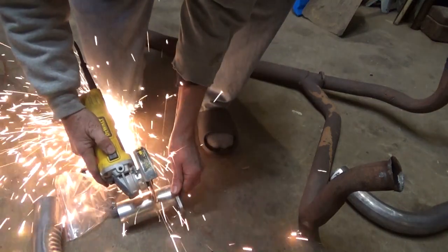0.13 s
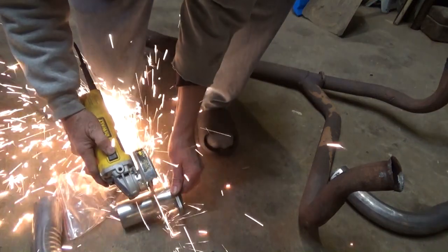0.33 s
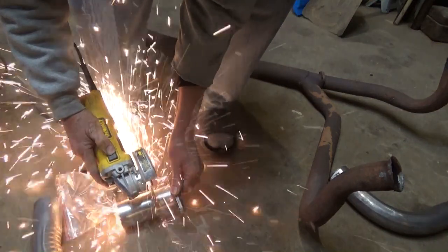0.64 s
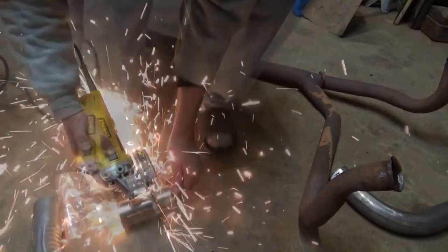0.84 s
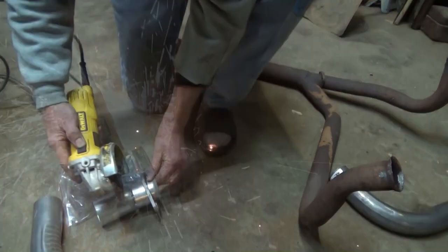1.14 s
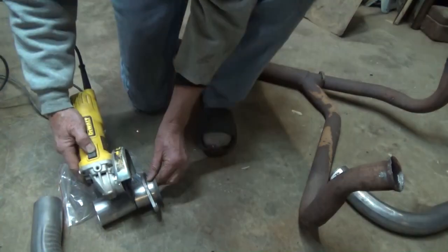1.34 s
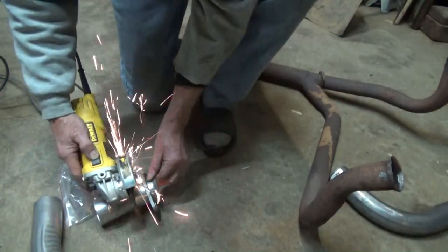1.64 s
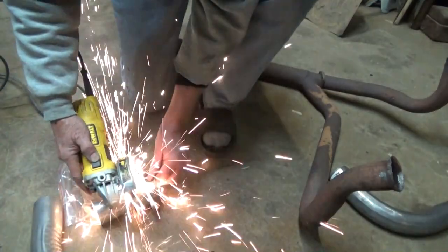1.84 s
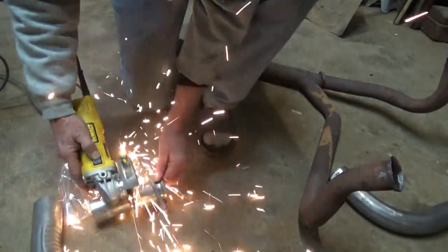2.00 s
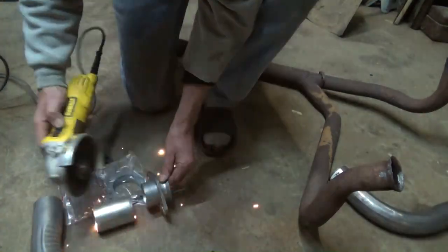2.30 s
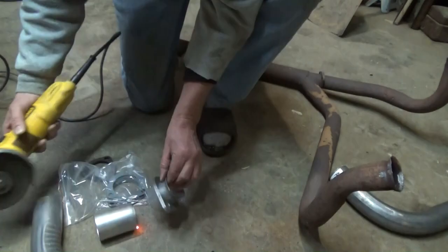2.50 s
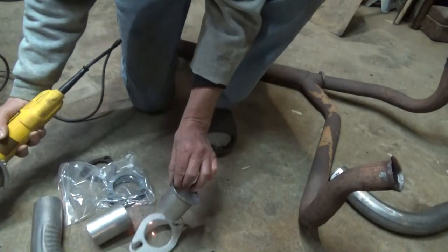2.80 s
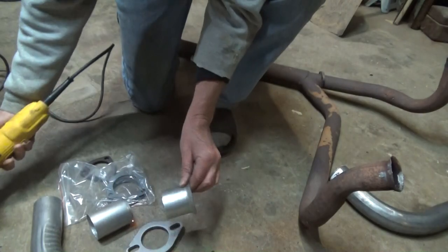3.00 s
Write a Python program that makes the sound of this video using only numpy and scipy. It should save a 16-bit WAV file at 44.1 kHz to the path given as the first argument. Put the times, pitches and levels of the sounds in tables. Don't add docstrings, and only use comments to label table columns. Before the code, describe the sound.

An angle grinder, slightly left, grinds a steel pipe with a dense, rough, bright screech and laboured motor until about 0.8 s, blending by 1.2 s into a rising free whine with rushing fan air. At 1.45-1.95 s it bites again, screeching as the pitch sags, then recovers and whirs higher. From 2.75 s the cut flange clinks repeatedly on concrete, ringing high and bright. Short garage reverberation; levels evened by gain control.

```python
import sys
import numpy as np
from scipy import signal
from scipy.fft import rfft, irfft, next_fast_len
from scipy.io import wavfile
from scipy.ndimage import uniform_filter1d

SR = 44100
rng = np.random.default_rng(int(sys.argv[2]) if len(sys.argv) > 2 else 0)


def amplitude_ratio(level_db):
    exponent = np.asarray(level_db, float) / 20
    return 10 ** exponent


def materialize(psi):
    bounded = np.clip(np.atleast_2d(psi).T, -1, 1)
    quanta = np.round(bounded * 32767).astype(np.int16)
    wavfile.write(sys.argv[1], SR, quanta)


N = 138915
T = np.arange(N) / SR
HZ = np.fft.rfftfreq(N, 1 / SR) + 1
GEAR_RATIO = 3.547
FAN_BLADES = 25

# time [s], air level [dB], air treble [dB], pan L-R [dB].
AIM = [(0, -30.5, -2, 2.5), (.5, -36, 1.5, 1.5), (1.2, -31, 0.5, 3), (1.4, -31.5, 2, 2.5),
       (1.7, -35, -0.5, 2.5), (2.0, -32, 0, 2), (2.25, -32, 0, 3.5), (2.4, -31, -4.5, 4.5),
       (2.5, -29.5, -6.5, 4.5), (2.65, -31, -6.5, 6), (2.76, -30.5, -5, 5), (2.85, -30.5, -5.5, 5),
       (3.15, -27.5, -4, 5)]


def in_time(rows):
    s, *columns = np.transpose(rows)
    return [np.interp(T, s, column) for column in columns]


def rms_one(x):
    return x / np.sqrt(np.mean(x ** 2) + 1e-20)


def drift(rate):
    r = np.exp(-80 * np.pi * rate / SR)
    noise = rng.standard_normal(N // 40 + 2002)
    slow = signal.lfilter([1], [1, -2 * r, r * r], noise)[2000:]
    return np.interp(np.arange(N) / 40, np.arange(len(slow)), rms_one(slow))


def tone(turns, db, wobble_db, rate=14):
    return np.sqrt(2) * amplitude_ratio(db + wobble_db * drift(rate)) * np.sin(2 * np.pi * turns)


def body(x, spectrum, peaks, peaks_db, patchy_db, treble_db=0, growl_db=0):
    hz, db = np.transpose(spectrum)
    power = amplitude_ratio(2 * np.interp(np.log(HZ), np.log(hz), db))
    for centre_hz, width_hz, level_db in peaks:
        resonance = 1 / (1 + (2 * (HZ - centre_hz) / width_hz) ** 2) ** 2
        power = power + amplitude_ratio(2 * (level_db + peaks_db)) * resonance
    wave = rfft(x) * np.sqrt(power)
    scale = 1 / np.std(irfft(wave, N))
    out, together = 0, drift(9.4)
    for step in range(17):
        octave = 6 + step / 2
        part = np.clip(1 - 2 * np.abs(np.clip(np.log2(HZ), 6, 14) - octave), 0, 1)
        treble_share = np.interp(octave, [12.2, 13.2, 13.8], [0, 1.3, .15])
        growl_share = np.interp(octave, [10.5, 11.2, 13.0, 12.1], [0, 1, 1, 0])
        tilt_db = treble_db * treble_share + growl_db * growl_share
        flicker_db = patchy_db * (.5 * together + drift(8.8))
        out = out + irfft(wave * part, N) * amplitude_ratio(flicker_db + tilt_db)
    return out * scale


def turning(turns, memory, fresh):
    facets = rng.standard_normal((700, 320))
    surface = signal.lfilter([1], [1, -np.clip(memory, 0, .98)], facets, axis=0).ravel()
    worn = surface[((turns + 40) * 320).astype(int) % surface.size]
    return rms_one(worn) + fresh * rng.standard_normal(N)


def cutting(wheel_turns, load_db, pipe, flats, memory, fresh, pipe_db, treble_db, growl_db=0):
    # frequency [Hz], density [dB per Hz].
    grit = [(40, -34), (1020, -26), (1700, -15), (2700, -5.5), (4300, -12.5), (8300, -3.5), (12000, -13),
            (15300, -22.5)]
    throb_db, thump_db = 2.0, -46
    once_a_turn = np.sin(2 * np.pi * wheel_turns)
    rub = (1 + 0.13 * once_a_turn) * turning(wheel_turns, memory, fresh)
    screech = body(rub, grit, pipe, pipe_db, 1.0, treble_db, growl_db + throb_db * once_a_turn)
    song = 0
    for multiple, db in flats:
        shift_db = .3 * growl_db if multiple < 24 else 2.5 * np.minimum(treble_db, 0)
        song = song + tone(multiple * wheel_turns, db + shift_db, 1.5, rate=15)
    return amplitude_ratio(load_db) * (screech + song + tone(wheel_turns, thump_db, 1.7))


def heavy_pass():
    # time [s], rotor tone [dB], cutting [dB], treble [dB], growl of the wheel digging in [dB].
    heavy = [(0, -60, -32.5, -1, -1), (.15, -52, -31.5, 1.5, 0), (.3, -55.5, -30.5, 2, 1.5),
             (.42, -56, -26.5, 1.5, -1), (.5, -60, -31, 4, -3.5), (.62, -55, -30.5, 2.5, -0.5),
             (.72, -63, -35.5, 5, 5), (.79, -58, -31, 3, 3), (.82, -59, -34.5, 3.5, -6),
             (1.0, -64, -34, 1, -2), (1.2, -61.5, -46, 9, -6)]
    # time [s], rotor speed [Hz].
    speed = [(0, 418), (.166, 403.4), (.368, 395.5), (.9, 384.6), (1.25, 384)]
    # centre [Hz], width [Hz], level [dB].
    long_pipe = [(600, 470, -27.5), (1600, 160, -26), (2210, 60, -9.5), (3200, 940, -9), (4680, 150, -10),
                 (5610, 190, -4), (6130, 200, -7.5), (6670, 170, -8), (7490, 140, -3.5), (8400, 134, 0.5),
                 (9120, 264, 1), (10430, 350, -11.5), (11700, 100, -13), (13000, 380, -15.5)]
    # multiple of wheel speed [1], level under the cutting [dB].
    flats = [(13, -33), (14, -31), (18, -27), (19, -27), (20, -25), (22, -25), (26, -24), (29, -23),
             (49, -23), (52, -23), (75, -21)]
    turns = np.cumsum(in_time(speed)[0]) / SR
    rotor_db, load_db, treble_db, growl_db = in_time(heavy)
    rotor = tone(turns, rotor_db, 1.5, rate=25)
    fan = tone(FAN_BLADES * turns, -45 - 18 * T, 2.0)
    mains = tone(60 * T, -80 - 9 * T, 2.0)
    cut = cutting(turns / GEAR_RATIO, load_db + 1.5, long_pipe, flats, memory=.84, fresh=.7,
                  pipe_db=6.5, treble_db=treble_db, growl_db=growl_db)
    return rotor + fan + mains + cut


def free_pass():
    # time [s], rotor tone [dB], fan whistle [dB], wheel wobble [dB].
    free = [(.72, -75, -62, -95), (.82, -53.5, -56, -95), (.95, -62, -52, -97), (1.12, -53.5, -54, -97),
            (1.2, -57.5, -49, -97), (1.4, -56.5, -51, -94), (1.55, -63, -62, -91), (1.65, -63.5, -65, -92),
            (1.9, -59, -51, -81), (1.97, -57.5, -46, -95), (2.2, -56.5, -50.5, -92), (2.4, -60, -46, -95),
            (2.52, -55.5, -51, -77), (2.85, -58, -52, -78), (2.9, -59, -42, -78), (3.15, -55.5, -52, -85)]
    # time [s], rotor speed [Hz].
    speed = [(.7, 490), (.8, 505), (.9, 530), (1.09, 565), (1.31, 588), (1.5, 600), (1.6, 600), (1.68, 592),
             (1.8, 572), (1.93, 557), (2.11, 579), (2.26, 592.3), (2.41, 601), (2.56, 608.5), (2.8, 615),
             (3.15, 620)]
    # time [s], cutting [dB], treble [dB], growl [dB].
    bite = [(1.42, -66, 0, 0), (1.44, -38, -1, 5), (1.525, -39.5, 3, -3), (1.55, -41, 10, -3),
            (1.6, -35, 1, 3), (1.66, -30.5, 0.5, 0.5), (1.72, -29, -1.5, -4.5), (1.8, -26.5, -1.5, -2.5),
            (1.88, -29, 1, -3.5), (1.95, -33.5, 2.5, -4), (1.975, -70, -2, 0)]
    # centre [Hz], width [Hz], level [dB].
    short_pipe = [(2510, 130, -5.5), (2957, 100, 1), (4450, 110, -7.5), (5495, 120, -1), (6500, 230, -5.5),
                  (7470, 220, -1.5), (7980, 150, -1), (8770, 450, -3), (9770, 600, -7.5), (11170, 180, -9),
                  (11400, 180, -12), (12600, 500, -16), (13600, 1400, -15.5)]
    # multiple of wheel speed [1], level under the cutting [dB].
    flats = [(10, -23), (15, -19), (16, -19), (18, -11.5), (19, -15), (20, -18), (21, -22), (27, -21),
             (34, -13), (35, -20), (40, -14), (46, -18), (50, -18), (53, -18), (54, -19), (57, -20),
             (61, -21), (70, -25), (72, -27), (77, -33), (79, -34), (84, -35), (86, -35)]
    # time [s], level [dB].
    gear_ring = [(.7, -62), (.85, -52), (1.05, -55), (1.2, -45), (1.3, -49), (1.4, -66), (2.3, -66),
                 (2.42, -49), (2.6, -62)]
    gear_ring_hz = 4790
    turns = np.cumsum(in_time(speed)[0]) / SR
    rotor_db, fan_db, wobble_db = in_time(free)
    rotor = tone(turns, rotor_db, 0.68, rate=22)
    fan = tone(FAN_BLADES * turns, fan_db, 1.7, rate=39)
    wheel = tone(turns / GEAR_RATIO, wobble_db, 1.1)
    gears = tone(gear_ring_hz * T + 0.13 * drift(34), in_time(gear_ring)[0], 2.1, rate=30)
    load_db, treble_db, growl_db = in_time(bite)
    cut = cutting(turns / GEAR_RATIO, load_db, short_pipe, flats, memory=.9, fresh=.5,
                  pipe_db=6.5, treble_db=treble_db, growl_db=growl_db)
    return rotor + fan + wheel + gears + cut


def grinder():
    dissolve_from_s, dissolve_to_s = 0.72, 1.27
    later = np.clip((T - dissolve_from_s) / (dissolve_to_s - dissolve_from_s), 0, 1)
    fade_out, fade_in = np.sqrt(1 - later), np.minimum(np.sqrt(3 * later), 1)
    return fade_out * heavy_pass() + fade_in * free_pass() + cooling_air()


def flange():
    # [dB, dB, dB, dB].
    touches = [(2.738, -44, -34, -33.5, -52), (2.759, -34.5, -42, -37, -54), (2.876, -25, -34, -27, -30),
               (2.888, -36, -15, -21.5, -21), (2.913, -25, -25, -20.5, -26), (2.936, -32, -20, -39, -27),
               (2.976, -31, -25, -17, -20.5), (2.991, -20.5, -22, -38, -21),
               (3.031, -24.5, -30, -36, -22.5), (3.066, -34, -20.5, -20.5, -26.5),
               (3.11, -40, -27.5, -28, -40)]
    # frequency [Hz], level [dB], t60 [s].
    mode_groups = [
        [(5785, 0, .9)],
        [(6423, 0, 1.2)],
        [(7072, 0, .5), (7935, -18, .1), (11569, -19, .08), (13076, -24, .25), (13970, -26, .3)],
        [(10163, 0, .8), (11581, -20, .3)],
    ]
    retune_s = .003
    crack_db, crack_s = 3, .0012
    thud_db, thud_s = -20, .02
    low_hz, low_db, low_from_s, low_to_s = 2950, -27, 2.87, 2.99
    rows, out = np.array(touches), np.zeros(N)
    last = np.searchsorted(rows[:, 0], T) - 1
    since_s, struck = np.abs(T - rows[last, 0]), last >= 0
    for k, group in enumerate(mode_groups):
        for hz, db, t60_s in group:
            ring = struck * amplitude_ratio(rows[last, k + 1] + db - 60 * since_s / t60_s)
            level = uniform_filter1d(ring, size=int(retune_s * SR))
            out += level * amplitude_ratio(0.8 * drift(17)) * np.sin(2 * np.pi * (hz * T + 0.05 * drift(41)))
    crack_band = signal.butter(4, [4800, 9000], "band", fs=SR, output="sos")
    crack = signal.sosfilt(crack_band, rng.standard_normal(N))
    out += struck * crack * amplitude_ratio(crack_db + rows[last, 3]) * np.exp(-since_s / crack_s)
    thud_band = signal.butter(2, [90, 300], "band", fs=SR, output="sos")
    blow = struck * amplitude_ratio(rows[last, 4]) * rng.standard_normal(N) * np.exp(-since_s / thud_s)
    out += amplitude_ratio(thud_db) * signal.sosfilt(thud_band, blow)
    rocking = np.clip((T - low_from_s) / (low_to_s - low_from_s), 0, 1)
    swell = np.sqrt(np.sin(np.pi * rocking) + 1e-9)
    return out + swell * amplitude_ratio(low_db) * np.sin(2 * np.pi * low_hz * T)


def cooling_air():
    # frequency [Hz], density [dB per Hz].
    air_spectrum = [(40, -70), (220, -42), (600, -27.5), (1270, -10.5), (7170, 1), (11200, -8),
                    (12600, -18), (15500, -27)]
    # centre [Hz], width [Hz], level [dB].
    housing = [(438, 173, -21.5), (795, 220, -17.5), (1280, 140, -12), (2857, 875, 1), (4870, 66, 2.5)]
    air_top_hz = 15200
    air_db, treble_db, _ = in_time(AIM)
    air = amplitude_ratio(air_db) * body(rng.standard_normal(N), air_spectrum, housing, 0, 1.0, treble_db)
    return irfft(rfft(air) * (HZ < air_top_hz), N)


def garage(x):
    t60_s = 0.47
    size = next_fast_len(N + SR)
    w, wave = np.linspace(0, np.pi, size // 2 + 1), rfft(x, size)
    lags = (rng.uniform(.012, .04, (2, 10)) * SR).astype(int)
    sides = []
    for side_lags in lags:
        echoes = 0
        for k, lag in enumerate(side_lags):
            loop_gain = amplitude_ratio(-60 * lag / SR / t60_s * (0.5 + 0.32 * w))
            echoes = echoes + (-1) ** k / (np.exp(1j * w * lag) / loop_gain - 1)
        sides.append(irfft(wave * echoes, size)[:N])
    return np.array(sides)


def scene():
    # frequency [Hz], share [1].
    lean = [(300, 0.53), (1300, 0.38), (6000, 0.76), (11500, 1.04), (15000, 1.2)]
    garage_db = -25
    tool, ring, side = grinder(), flange(), np.array([[1], [-1]])
    lean_hz, share = np.transpose(lean)
    leaning = irfft(rfft(tool) * np.interp(np.log(HZ), np.log(lean_hz), share), N)
    pan = np.tanh(in_time(AIM)[2] * np.log(10) / 40)
    direct = tool + side * pan * leaning + ring * amplitude_ratio(side * 0.91)
    return direct + amplitude_ratio(garage_db) * garage(tool + ring)


def top_cut(x):
    return signal.sosfilt(signal.butter(12, 16270, fs=SR, output="sos"), x)


def record(dry):
    threshold_db, share, release_db_per_s, attack_s = -29.5, 0.86, 88, 0.001
    low_cut_hz, top_hz = 50, 15830
    level_db = 10 * np.log10(uniform_filter1d(np.mean(dry ** 2, axis=0), size=400) + 1e-12)
    release_db = release_db_per_s * T
    held_db = np.maximum.accumulate(level_db + release_db) - release_db
    r = np.exp(-1 / (attack_s * SR))
    cut_db = signal.lfilter([1 - r], [1, -r], share * np.maximum(held_db - threshold_db, 0))
    response = (HZ < top_hz) / np.sqrt(1 + (low_cut_hz / HZ) ** 4)
    mix = irfft(rfft(dry * amplitude_ratio(-cut_db)) * response, N)
    return top_cut(mix)


dry = scene()
out = record(dry)
materialize(out)
```